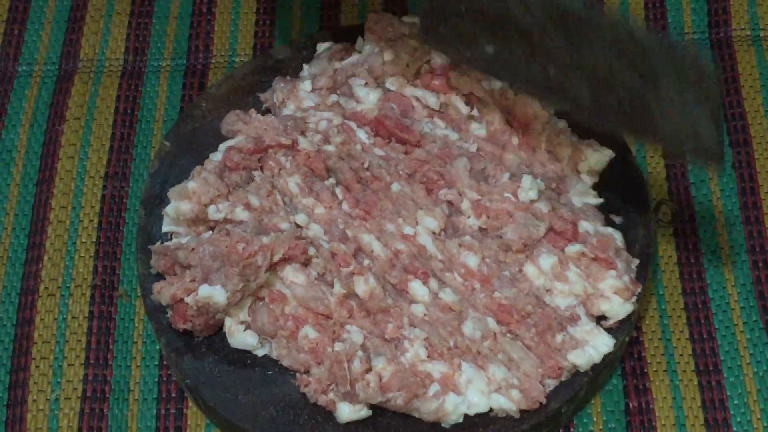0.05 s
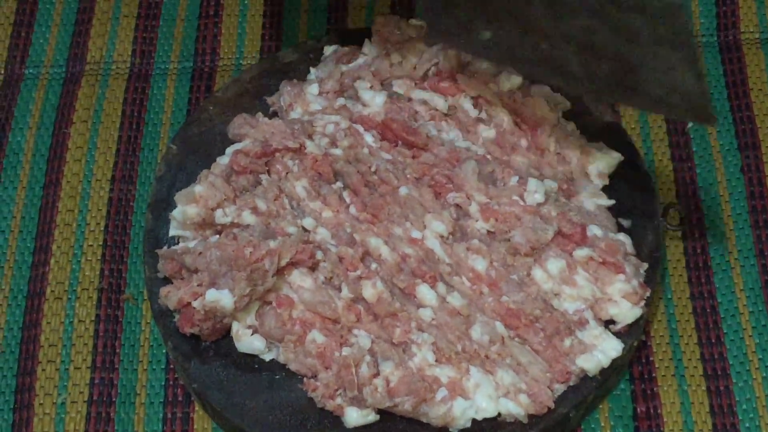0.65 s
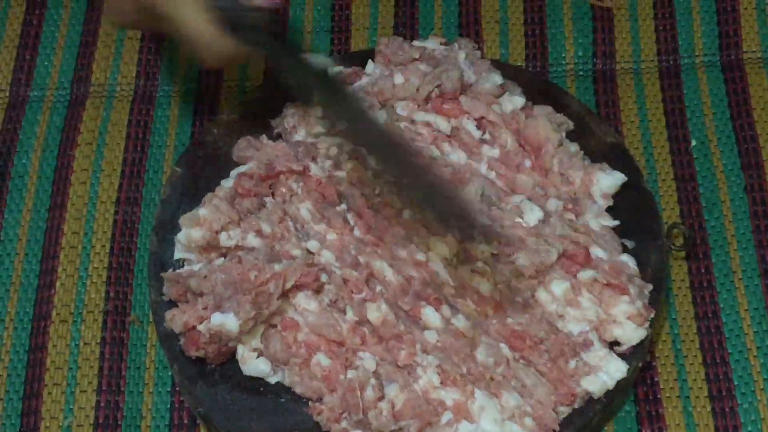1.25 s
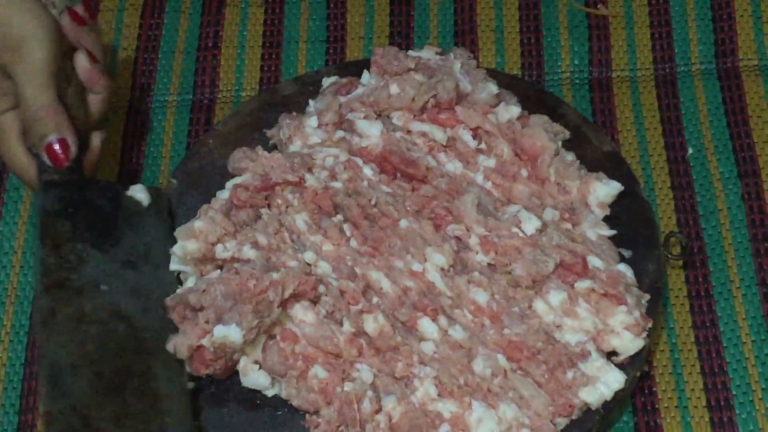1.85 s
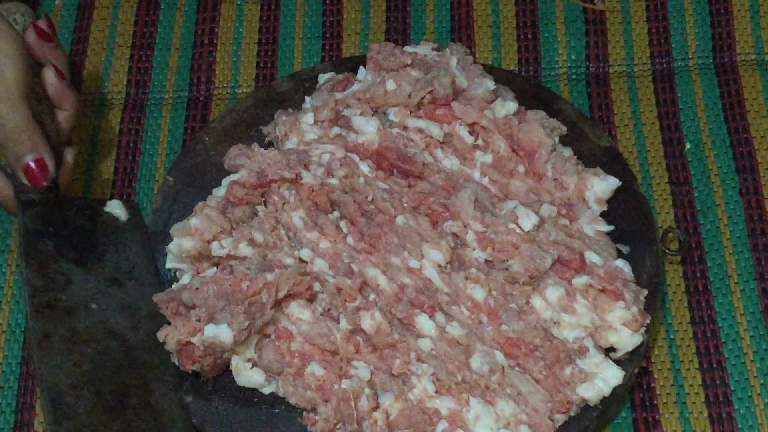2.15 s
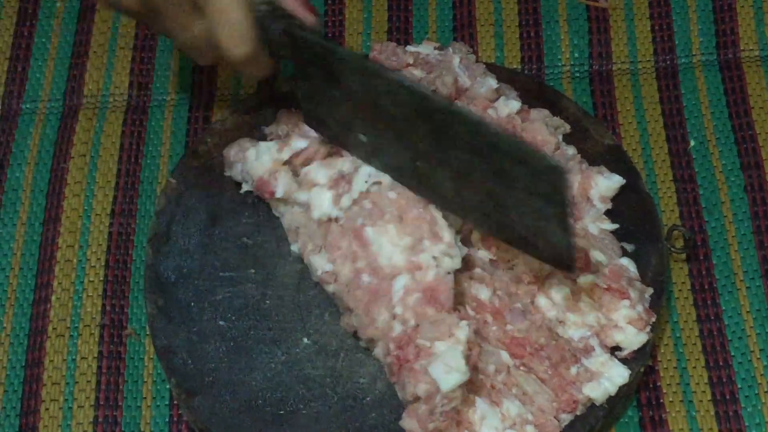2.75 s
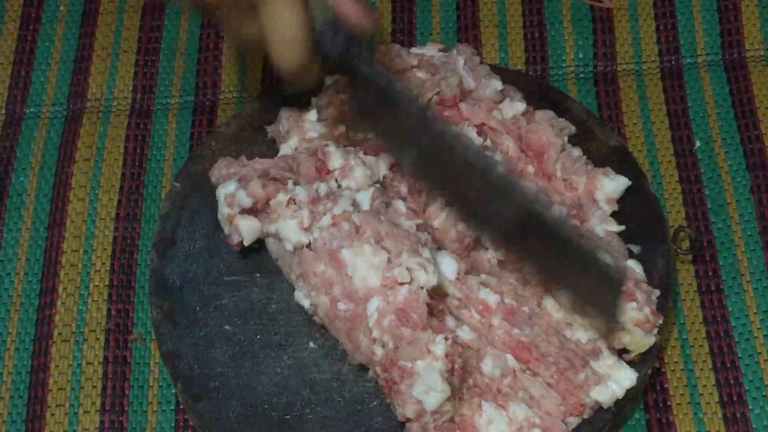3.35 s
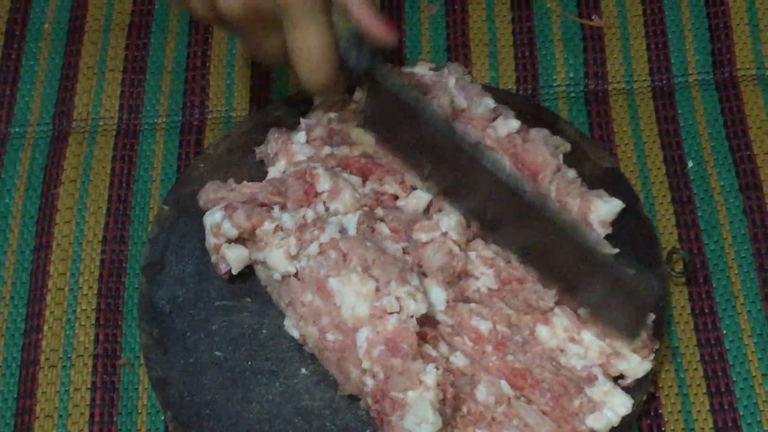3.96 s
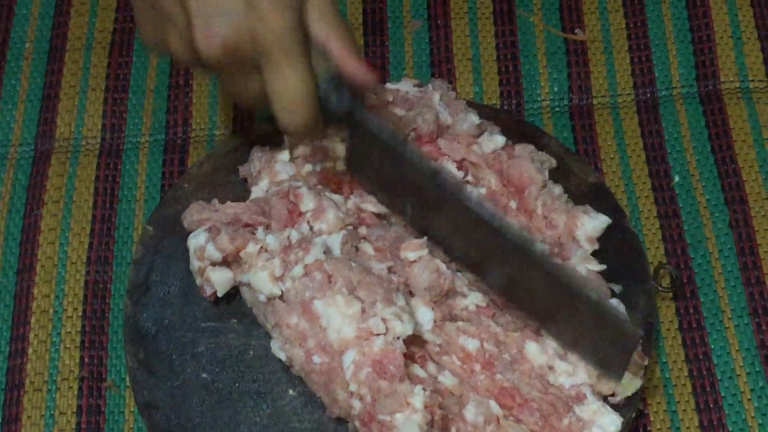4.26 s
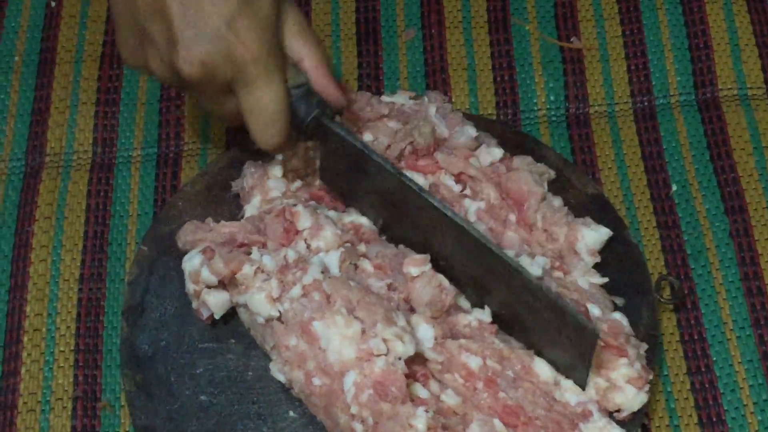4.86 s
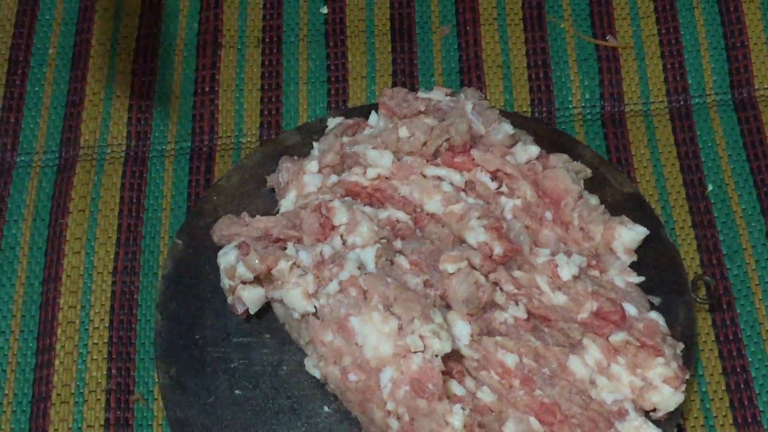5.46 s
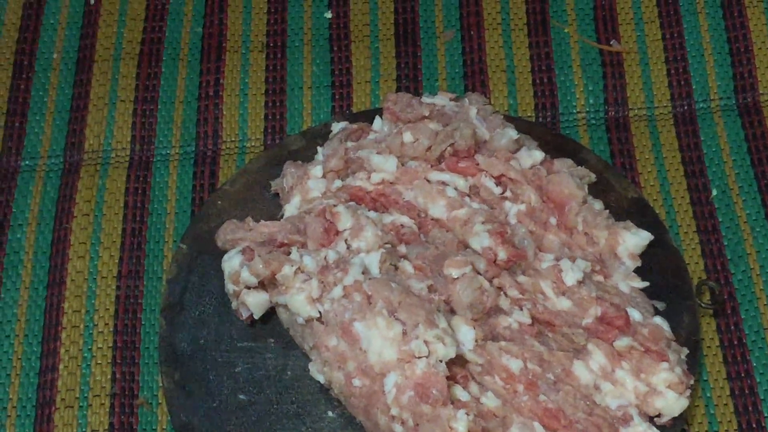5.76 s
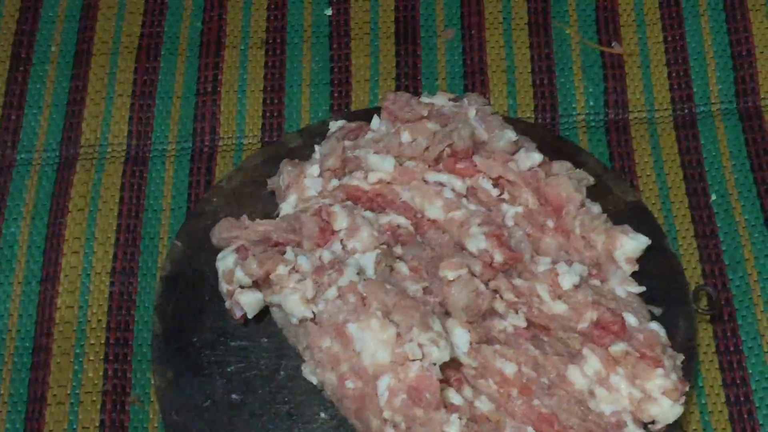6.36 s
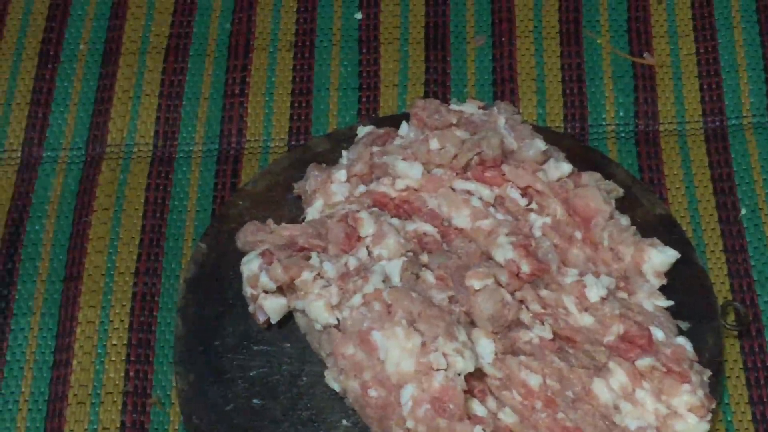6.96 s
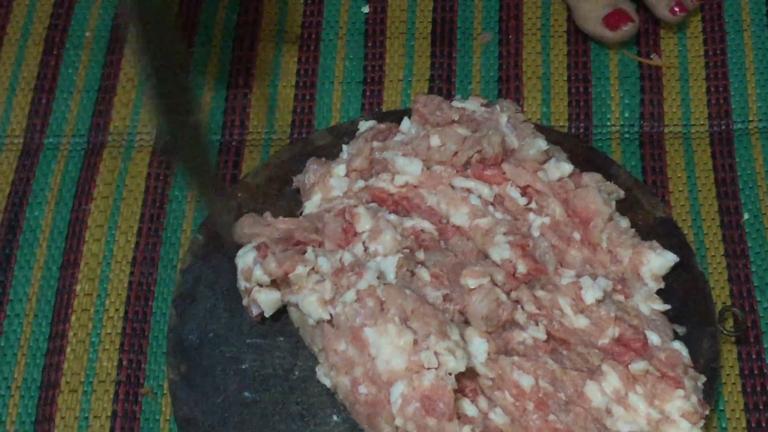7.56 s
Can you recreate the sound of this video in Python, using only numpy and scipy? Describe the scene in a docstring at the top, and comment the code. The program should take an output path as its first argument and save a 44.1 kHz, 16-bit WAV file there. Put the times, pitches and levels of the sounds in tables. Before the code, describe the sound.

Two runs of close, squelchy cleaver thuds on a thick wooden board, while someone knocks farther off over a low kitchen hum.

```python
"""In a kitchen, close by, a cleaver chops minced meat on a thick wooden board in two quick runs.
Each chop squelches through the meat, knocks the board and booms in the stand under it. Sticky mince
pops and peels off the blade. Between the runs the blade scoops the mince over; after them the cook
shuffles softly. Farther off someone else knocks slowly in an echoing room, and an appliance hums."""
import sys
import numpy as np
from scipy import signal
from scipy.fft import rfft, irfft, next_fast_len
from scipy.io import wavfile
from scipy.ndimage import map_coordinates

SR = 44100
rng = np.random.default_rng(int(sys.argv[2]) if len(sys.argv) > 2 else 0)


def materialize(psi):
    """Save the field psi as 16-bit PCM at rate SR to the path in sys.argv[1].

    A 1-D psi becomes a single channel; in a 2-D psi each row is a channel.
    """
    bounded = np.clip(np.atleast_2d(psi).T, -1, 1)
    quanta = np.round(bounded * 32767).astype(np.int16)
    wavfile.write(sys.argv[1], SR, quanta)


N = 336042
T = np.arange(int(.6 * SR)) / SR  # time axis of one short sound, in seconds
TICK_S = .0018  # how fast a tick or pop fades

# the cleaver's blows: t/s, knock level/dB, clack level/dB, clack cut-off f/Hz, squelch level/dB
CHOPS = [(-.016, -16.5, -23, 1600, -33.5), (0.2706, -15.5, -24, 1880, -32.5),
         (0.5545, -13.5, -21.5, 1900, -28.5), (.849, -18.5, -28.5, 1380, -30.5),
         (1.157, -18.5, -30, 1700, -32.5), (3.354, -29, -28.5, 2670, -34.5),
         (3.662, -20.5, -23.5, 2330, -34), (3.971, -22.5, -27, 2430, -37),
         (4.2767, -25.5, -27, 1640, -31.5), (4.556, -14.5, -16, 1770, -34), (4.8841, -13, -15, 1720, -31.5)]
# tone colour of wet mince: f/Hz, level/dB
SQUELCH_COLOUR = [(500, -10), (1500, 0), (3500, -6), (5000, -7), (6500, -2.5), (8000, -9), (11000, -10),
                  (16000, -15)]
# pitches at which the held blade rings: f/Hz, width/Hz, level/dB
BLADE_PEAKS = [(570, 33, 4.5), (1452, 73, 0), (2170, 84, -5.5), (3340, 19, 1.5), (4330, 38, -6),
               (5630, 50, -5.5), (6680, 140, -6.5), (9480, 180, -7), (11300, 140, -16), (14600, 310, -12)]
# how long the kitchen echoes: f/Hz, time to fade by 60 dB/s
KITCHEN_FADE = [(120, 0.28), (600, 0.31), (2000, 0.29), (6000, 0.23), (15000, 0.19)]


def chops():
    """The edge crackles through the meat, then hits the board, which knocks and shakes its stand."""
    # ringing tones of the board and of its stand: f/Hz, level/dB, time to fade by 60 dB/s
    board_tones = [(275, -10, 0.024), (437, -7, 0.024), (609, 3, 0.019), (698, -1, 0.016),
                   (878, -1.5, 0.014), (685, -25.5, 0.32)]
    stand_tones = [(82.5, -6, 0.32), (121, 1, 0.25), (144.2, 5.5, 0.14), (239, -4, 0.077),
                   (272.6, -8.5, 0.28), (459, -10, 0.076)]
    # tone colour of the edge hitting wood: f/Hz, level/dB
    clack_colour = [(450, -17), (800, -6), (1050, 6), (1600, 4.5), (2300, 2), (2900, -9.5), (3600, 3),
                    (4600, 6.5), (12000, -37)]
    clean_knock_db, clean_cut_s = -14, .0042  # a clean blow goes through the meat at once
    hz = np.geomspace(100, 16000, 60)
    track = np.zeros(N)
    for start, knock_db, clack_db, cutoff_hz, squelch_db in CHOPS:
        knock = ring(board_tones, attack_s=.0018, detune=.03, scatter_db=1.5)
        boom = ring(stand_tones, attack_s=.0021, detune=.029, scatter_db=5)
        add(track, start, amp(knock_db) * in_kitchen(knock, echo_db=-5.5) + amp(-23.5) * boom)
        # each chop's clack has its own cut-off, so some sound brighter and others duller
        colour_db = along(clack_colour, hz) - 10 * np.log10(1 + (hz / cutoff_hz) ** 8)
        clack, clack_echo = blow(T * np.exp(-T / .0011), np.c_[hz, colour_db], echo_db=-13.5)
        add(track, start, amp(clack_db) * (clack + clack_echo))
        # thicker meat softens the knock and takes longer to cut: twice as long per 7 dB
        cut_s = clean_cut_s * 2 ** ((clean_knock_db - knock_db) / 7)
        # the squelch swells as the meat is squeezed and stops soon after the edge lands
        swell = amp(-13 * (2 - np.minimum(T / cut_s, 1)))
        fade = amp(-60 * np.abs(T - cut_s) / .016)
        squelch, squelch_echo = blow(np.where(T < cut_s, swell, fade), SQUELCH_COLOUR, echo_db=-10)
        add(track, start - cut_s, amp(squelch_db) * squelch)
        add(track, start, amp(squelch_db) * squelch_echo)
    return track


def blow(envelope, colour, echo_db):
    """Return a noisy burst with a hint of ringing steel, and an echo of the same tone colour."""
    noise = coloured(envelope * crackle(len(T), spread_db=2), colour)
    peaks = [(hz, 1.5 * width, 0) for hz, width, _ in BLADE_PEAKS]
    steel = coloured(resonate(rng.standard_normal(len(T)) * envelope, peaks), colour)
    direct = burst(burst(noise) + amp(-8) * burst(steel))
    return direct, amp(echo_db) * echo_burst(KITCHEN_FADE, colour, build_s=.004)


def spatter():
    """After every chop two bits of mince pop off the rising blade."""
    track = np.zeros(N)
    for start, *_ in CHOPS:
        for lateness, size in rng.random((2, 2)):
            pop = clump(TICK_S, hz=9000, echo_db=-9)
            add(track, start + .03 + .06 * lateness, amp(-64 + 2.5 * size) * pop)
    return track


def smacks():
    """Mince peels off the blade and things are shifted: short clumps of pops."""
    # soft sticky smacks: t/s, level/dB, centre f/Hz
    peels = [(0.201, -47.5, 7800), (.457, -48, 4800), (1.32, -58.5, 3500), (1.589, -57, 11000),
             (2.916, -52.5, 7900), (4.513, -56, 6000), (5.32, -53, 7800), (5.614, -58.5, 8000),
             (5.943, -57, 6000), (5.969, -52.5, 3800), (6.349, -59, 6000), (6.802, -43, 3180)]
    # sharp ticks of mince and of things being handled: t/s, level/dB, centre f/Hz, echo level/dB
    ticks = [(1.261, -50.5, 8000, -20), (1.268, -54.5, 8000, -6.5), (6.784, -44, 5500, -1),
             (6.799, -48.5, 4500, -2), (6.811, -43, 3970, -20), (6.863, -46, 2070, -1),
             (6.945, -45, 3060, -1), (7.354, -49, 1560, 0)]
    usual_s, usual_db = .042, -56.5  # a middling smack
    track = np.zeros(N)
    for start, db, hz in peels:
        peel_s = usual_s * 2 ** ((db - usual_db) / 19)  # a bigger patch takes longer to peel
        add(track, start, amp(db) * clump(peel_s, hz, echo_db=-2.5))
    for start, db, hz, echo_db in ticks:
        add(track, start, amp(db) * clump(TICK_S, hz, echo_db))
    return track


def clump(fade_s, hz, echo_db):
    """A short clump of tiny pops and its echo in the kitchen."""
    swell = np.exp(-T / fade_s) * (1 - np.exp(-5 * T / fade_s))
    pops = burst(coloured(crackle(len(T), spread_db=7) * swell, hump(hz)))
    return pops + amp(echo_db) * echo_burst(KITCHEN_FADE, hump(hz), build_s=.006)


def scoop(start_s=2.475, hold_s=.04):
    """The flat of the cleaver taps the board, then stutters along it and smears the mince over."""
    # the blade touching the board: t/s, level/dB
    touches = [(2.294, -33.5), (2.298, -41)]
    damped_peaks = [(hz, 3.2 * width, db) for hz, width, db in BLADE_PEAKS]  # lying flat dulls the ring
    taps = np.zeros(N)
    for start, db in touches:
        click = rng.standard_normal(len(T)) * T * np.exp(-T / .00084)
        contact = coloured(click, [(1500, 5), (3000, 0), (6000, -21), (16000, -15)])
        add(taps, start, amp(db) * burst(resonate(contact, damped_peaks)))
    # the steel soon leaves the board; the mince goes on sliding
    scraping = amp(-49.5) * stroke(start_s, hold_s, rise_db_per_s=305, fall_db_per_s=170)
    smearing = amp(-51.5) * stroke(start_s, hold_s, rise_db_per_s=305, fall_db_per_s=65)
    steel = stutter()
    wet_pops = crackle(N, spread_db=6) * amp(4 * wobble(120))
    mince = unit(coloured(wet_pops, SQUELCH_COLOUR))
    return in_kitchen(taps + scraping * steel + smearing * mince, echo_db=-4.5)


def stutter(slips_per_s=200, bends=3):
    """The edge catches and slips unevenly; bending shifts the blade's pitch a little between slips."""
    steel = np.zeros(N)
    for pitch_ratio in 1 + np.linspace(-.037, .037, bends):
        sizes = amp(.5 * np.clip(rng.standard_normal(N), -2, 2))
        slips = (rng.random(N) < slips_per_s / bends / SR) * sizes
        rasp = coloured(slips, [(600, -15), (1400, -15), (2000, 5), (3500, -3), (16000, -2)])
        steel += resonate(rasp, [(hz * pitch_ratio, width, db) for hz, width, db in BLADE_PEAKS])
    return unit(steel)


def shuffle():
    """A soft low rustle as the cook shifts after chopping."""
    rustle = unit(coloured(rng.standard_normal(N), hump(hz=195)))
    return amp(-53.5) * stroke(start_s=5.33, hold_s=.305, rise_db_per_s=250, fall_db_per_s=250) * rustle


def far_knocks():
    """Each distant knock is a dull thud, then a brighter ringing clatter heard as echo."""
    # the double knocks: t/s, thud level/dB, clatter level/dB
    knocks = [(.052, -37.5, -32.5), (.692, -50.5, -42), (1.518, -57, -49), (2.057, -29.5, -29),
              (2.546, -32, -30), (2.958, -34, -26.5), (5.352, -44, -47.5), (5.737, -30.5, -29),
              (6.124, -22, -26.5), (6.498, -32.5, -32.5), (7.095, -27, -21.5), (7.512, -23.5, -27)]
    # ringing tones of the thud: f/Hz, level/dB, time to fade by 60 dB/s
    thud_tones = [(377, 8, 0.039), (487, -6, 0.024), (661, -1, 0.13), (1283, 0, 0.03)]
    # tone colours of a knock's dull body and bright edge: f/Hz, level/dB
    body_colour = [(150, -34.5), (290, -8), (400, 1), (480, 2), (590, 5), (710, -1), (860, -14),
                   (1300, -6.5), (3000, -62)]
    edge_colour = [(600, -24.5), (950, -5.5), (1300, -0.5), (1900, -4.5), (2400, -10), (3200, -11.5),
                   (4500, -22), (6500, -27.5), (9000, -38), (16000, -47)]
    # pitches at which the struck thing rings: f/Hz, width/Hz, level/dB
    struck_peaks = [(630, 54, 1), (1306, 170, 3.5), (1780, 360, 0.5), (2045, 92, 3.5), (2620, 470, -6),
                    (2975, 145, -5), (3550, 210, -10.5)]
    # how long the far room echoes: f/Hz, time to fade by 60 dB/s
    room_fade = [(400, 0.36), (1400, 0.4), (4000, 0.39), (10000, 0.26)]
    usual_db = -30  # a middling knock
    track = np.zeros(N)
    for start, thud_db, clatter_db in knocks:
        # a harder knock has more body and takes longer to bounce back
        force_db = (thud_db + clatter_db) / 2 - usual_db
        body_db = -29 + 1.43 * force_db
        bounce_s = .0145 * 2 ** (force_db / 9)
        thud = ring(thud_tones, attack_s=.0025, detune=.04, scatter_db=2)
        add(track, start - .001, amp(thud_db) * thud)
        dull_echo = echo_burst(room_fade, body_colour, build_s=.014)
        bright_echo = echo_burst(room_fade, edge_colour, build_s=.012)
        add(track, start - .006, amp(thud_db) * (amp(.5) * dull_echo + amp(-11.5) * bright_echo))
        body = echo_burst(room_fade, body_colour, build_s=.006)
        edge = echo_burst(room_fade, edge_colour, build_s=.009)
        wash = echo_burst(room_fade, [(3500, 0), (9000, -25)], build_s=.005)
        ringing = burst(resonate(wash, struck_peaks))
        clatter = (edge + ringing) / np.sqrt(2)
        add(track, start + bounce_s - .003, amp(body_db) * body + amp(clatter_db) * clatter)
    return track


def appliance():
    """Steady rushing air with a faint whirr and a few wavering motor tones."""
    # tone colour of the rushing air: f/Hz, level/dB
    air_colour = [(22, -18), (45, -10.5), (64, -1.5), (79, -8.5), (97, -5.5), (120, 0), (150, -8),
                  (310, -10.5), (380, -14.5), (620, -22), (1050, -21), (1800, -39.5), (4000, -44.5),
                  (16000, -50)]
    # the motor's tones: f/Hz, level/dB
    motor_tones = [(64.6, -72.5), (145.3, -60), (199.2, -62.5), (301.5, -61), (403.7, -64), (667.5, -71.5),
                   (1206, -76), (1270, -66)]
    t = np.arange(N) / SR
    air = amp(-51.5) * unit(coloured(rng.standard_normal(N), air_colour))
    whirr = amp(-63) * unit(resonate(rng.standard_normal(N), [(1185, 230, 0)]))
    hum = np.zeros(N)
    for hz, db in motor_tones:
        strength = np.sqrt(2) * amp(db + 4.2 * wobble(3.486))
        hum += strength * np.sin(2 * np.pi * hz * t + 1.73 * wobble(9))
    return air + whirr + hum


def in_kitchen(sound, echo_db):
    """A near sound followed by the kitchen's echoes."""
    # tone colour of the echoes: f/Hz, level/dB
    room_colour = [(60, -18), (200, 14), (400, -2), (700, -5.5), (1100, 0), (2000, -10), (5000, -2),
                   (16000, -74)]
    echoes = coloured(tail(KITCHEN_FADE, build_s=.0025), room_colour)
    return sound + amp(echo_db) * signal.fftconvolve(sound, echoes)[:len(sound)]


def tail(fade_times, build_s):
    """Blurred echoes of energy 1 that build up, then die at each frequency's own speed."""
    hz, t, spectra = signal.stft(rng.standard_normal(len(T)), SR, nperseg=256)
    fade = amp(-60 * t / along(fade_times, hz)[:, None])
    echoes = signal.istft(spectra * fade, SR, nperseg=256)[1][:len(T)]
    echoes *= 1 - np.exp(-(T / build_s) ** 2)
    return echoes / np.linalg.norm(echoes)


def echo_burst(fade_times, colour, build_s):
    """A room's echo of a short hit with the given tone colour."""
    return burst(coloured(tail(fade_times, build_s), colour))


def ring(tones, attack_s, detune, scatter_db):
    """A struck thing's fading tones; their pitch and strength change with the spot that is hit."""
    sound = np.zeros(len(T))
    for k, (hz, db, fade_s) in enumerate(tones):
        louder, higher = rng.standard_normal(2)
        envelope = amp(db + scatter_db * louder - 60 * T / fade_s)
        sound += (-1) ** k * envelope * np.sin(2 * np.pi * hz * (1 + detune * higher) * T)
    return burst(sound * (1 - np.exp(-(T / attack_s) ** 2)))


def crackle(samples, spread_db):
    """Noise made of tiny pops of unequal size."""
    sizes = np.repeat(rng.standard_normal(samples // 16 + 1), 16)[:samples]
    return rng.standard_normal(samples) * amp(spread_db * np.clip(sizes, -2, 2))


def stroke(start_s, hold_s, rise_db_per_s, fall_db_per_s):
    """A gain that rises to 1 at start_s, holds, then falls away."""
    t = np.arange(N) / SR - start_s
    return amp(-rise_db_per_s * np.maximum(-t, 0) - fall_db_per_s * np.maximum(t - hold_s, 0))


def wobble(rate):
    """A smooth curve through `rate` random points a second."""
    return map_coordinates(rng.standard_normal(int(N * rate / SR) + 4), [np.arange(N) * rate / SR])


def hump(hz):
    """A broad tone colour, strongest at hz."""
    return [(hz / 8, -32), (hz / 3, -7), (hz, 0), (1.8 * hz, -7), (3.5 * hz, -16), (8 * hz, -45)]


def coloured(x, colour, size=2048):
    """Give x a tone colour (f/Hz, level/dB) with a filter that never sounds ahead of its input."""
    log_gain = np.log(amp(along(colour, np.fft.rfftfreq(size, 1 / SR))))
    cepstrum = irfft(log_gain)
    # fold the part before time zero onto the part after it
    cepstrum[1:size // 2] *= 2
    cepstrum[size // 2 + 1:] = 0
    click_response = irfft(np.exp(rfft(cepstrum)))
    return signal.fftconvolve(x, click_response)[:len(x)]


def resonate(x, peaks):
    """Make x ring at each peak (f/Hz, width/Hz, level/dB)."""
    return filtered(x, lambda f: sum(
        (-1) ** k * amp(db) * 1j * f * width / (hz * hz - f * f + 1j * f * width)
        for k, (hz, width, db) in enumerate(peaks)))


def filtered(x, response):
    """Multiply each frequency in x by response(frequency)."""
    size = next_fast_len(len(x) + 8192)
    return irfft(rfft(x, size) * response(np.fft.rfftfreq(size, 1 / SR)), size)[:len(x)]


def along(points, hz):
    """Read between (f/Hz, value) points, with octaves evenly spaced."""
    freqs, values = np.transpose(points)
    return np.interp(np.log(hz + 1), np.log(freqs + 1), values)


def amp(db):
    """Turn decibels into a gain."""
    return 10 ** (np.asarray(db) / 20)


def unit(x):
    """Scale to an average strength (rms) of 1."""
    return x / np.sqrt(np.mean(x ** 2) + 1e-20)


def burst(x):
    """Scale a short sound to the energy of ten milliseconds at rms 1."""
    return x * np.sqrt(SR / 100 / (np.sum(x ** 2) + 1e-20))


def add(track, start_s, sound):
    """Mix a sound into the track, dropping what falls outside it."""
    start = round(start_s * SR)
    part = sound[max(-start, 0):N - start]
    track[max(start, 0):][:len(part)] += part


def scene():
    """Mix all the sources into one channel."""
    return (chops() + spatter() + smacks() + shuffle() + scoop() + far_knocks() + appliance())[None]


def record(dry):
    """Round off the highest peaks and cut the very top of the treble."""
    ceiling, top_hz = .8, 16100
    rounded = dry[0] / (1 + np.abs(dry[0] / ceiling) ** 6) ** (1 / 6)
    return filtered(rounded, lambda hz: hz < top_hz)[None]


dry = scene()
out = record(dry)
materialize(out)
```